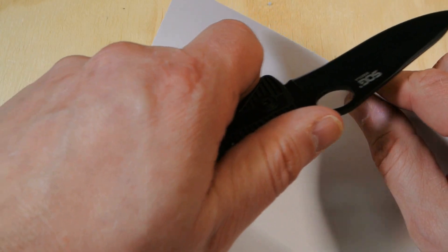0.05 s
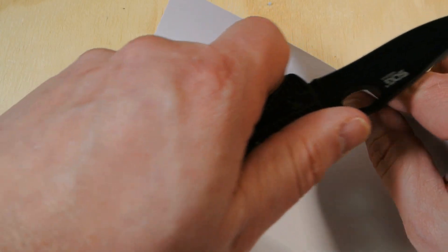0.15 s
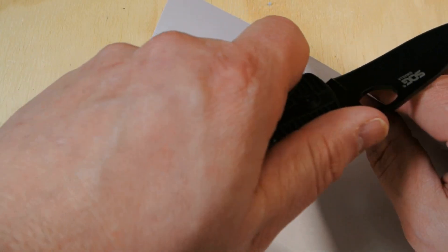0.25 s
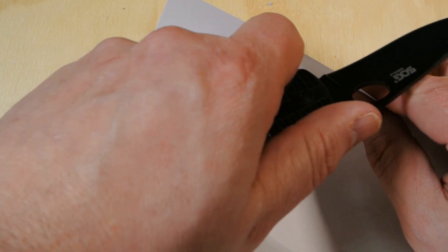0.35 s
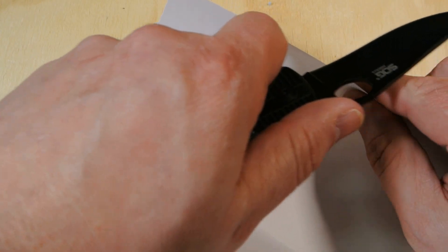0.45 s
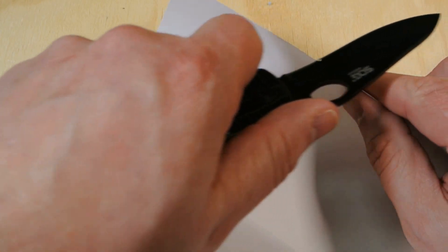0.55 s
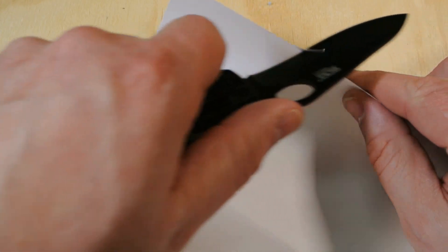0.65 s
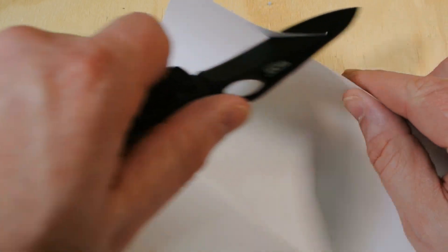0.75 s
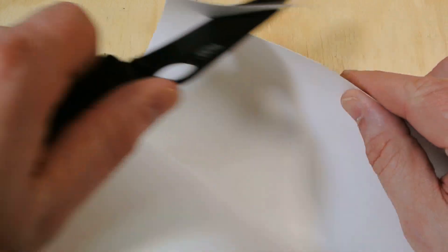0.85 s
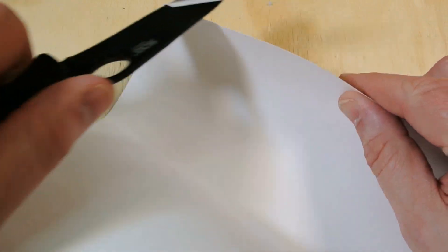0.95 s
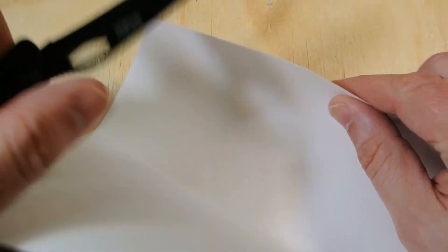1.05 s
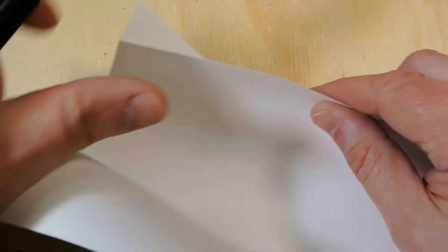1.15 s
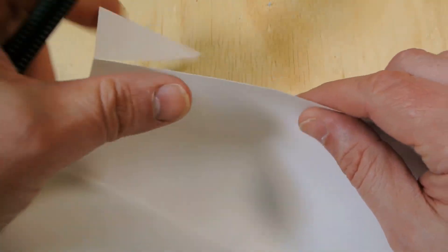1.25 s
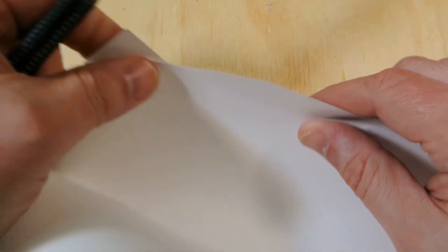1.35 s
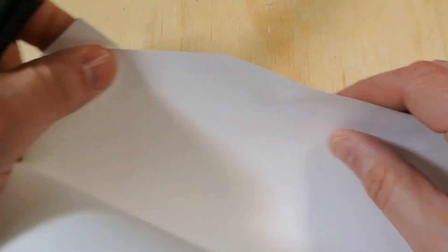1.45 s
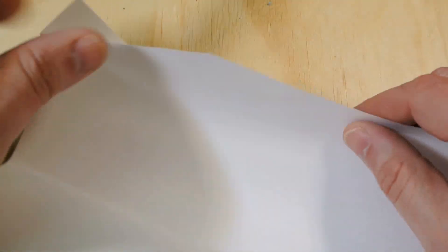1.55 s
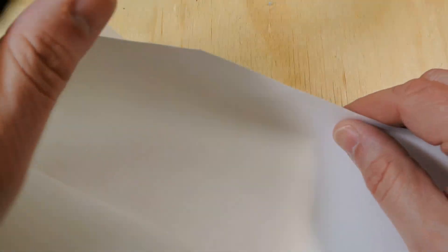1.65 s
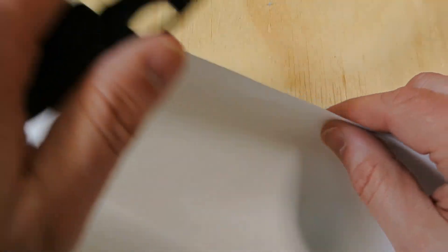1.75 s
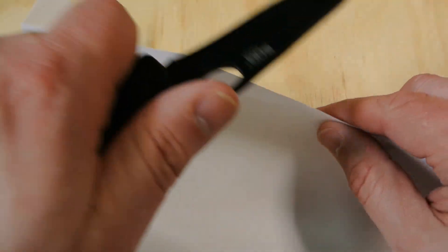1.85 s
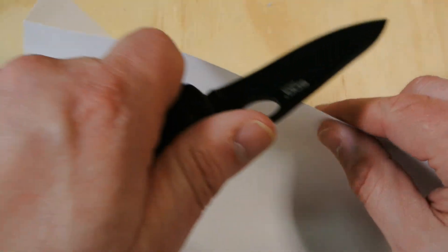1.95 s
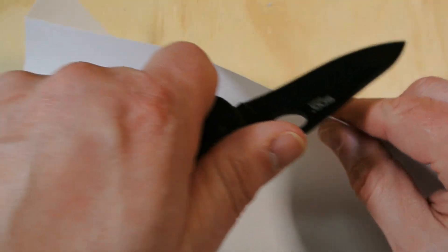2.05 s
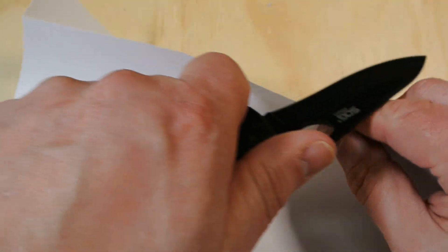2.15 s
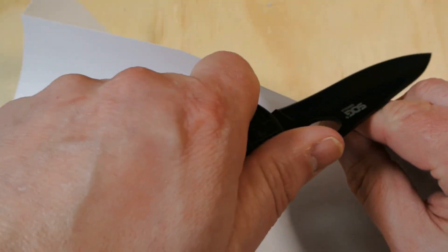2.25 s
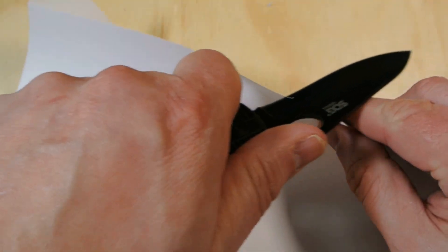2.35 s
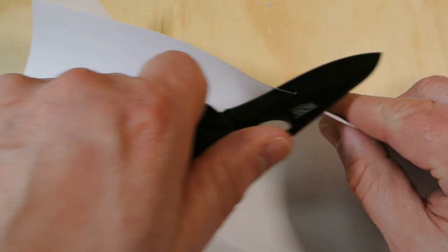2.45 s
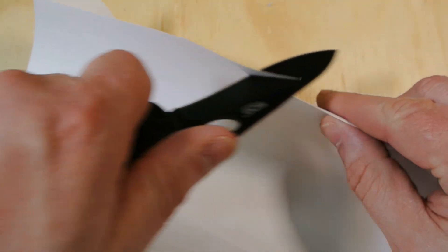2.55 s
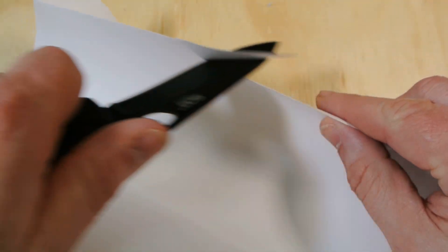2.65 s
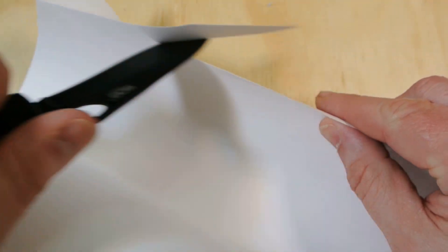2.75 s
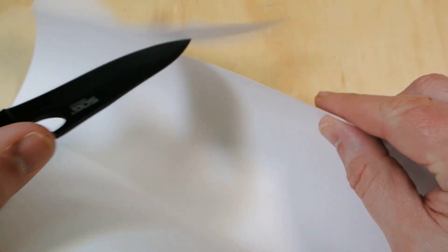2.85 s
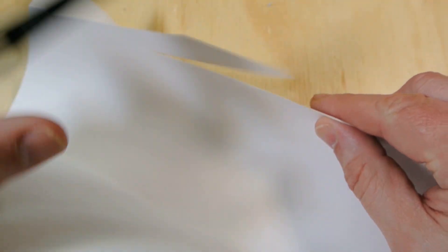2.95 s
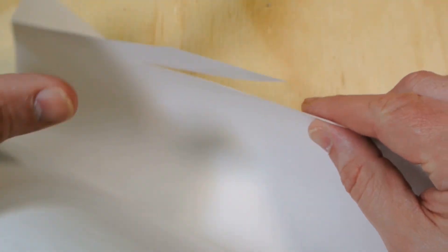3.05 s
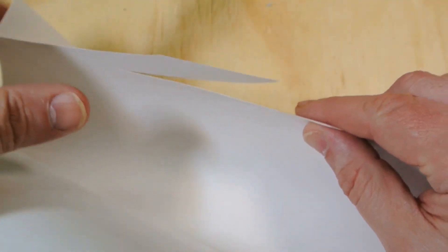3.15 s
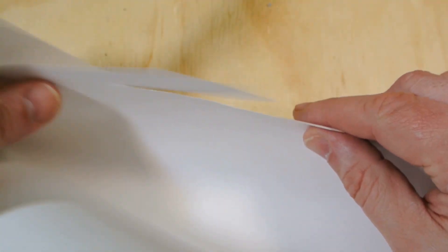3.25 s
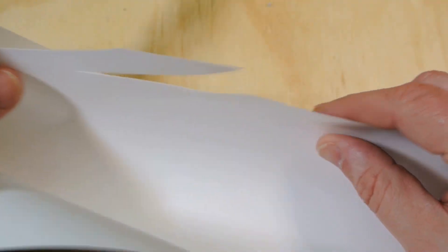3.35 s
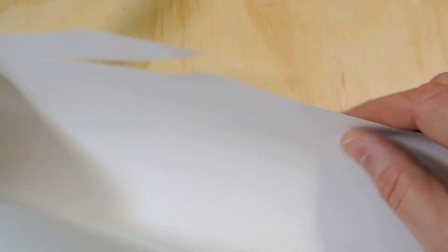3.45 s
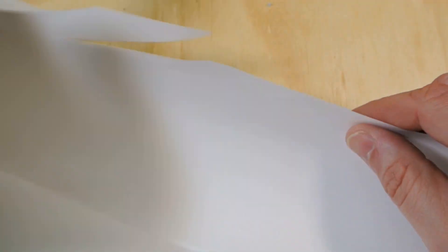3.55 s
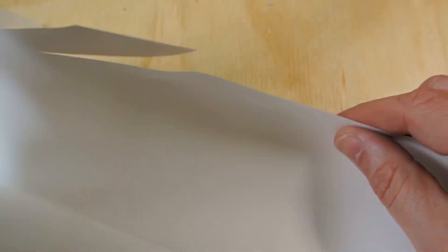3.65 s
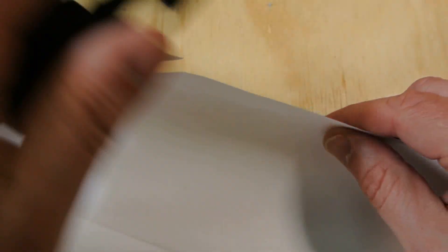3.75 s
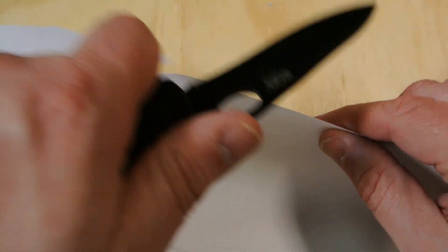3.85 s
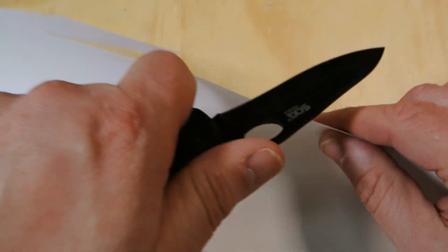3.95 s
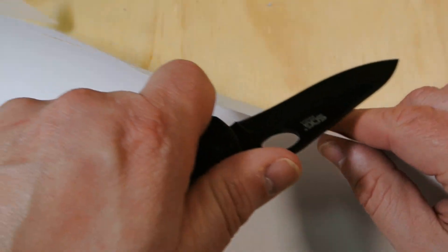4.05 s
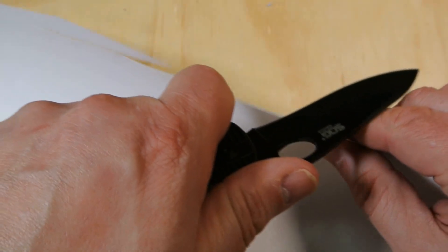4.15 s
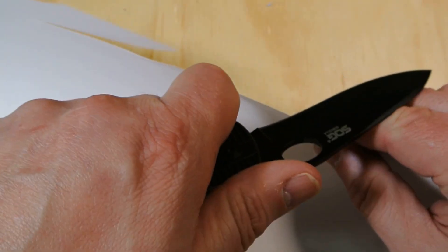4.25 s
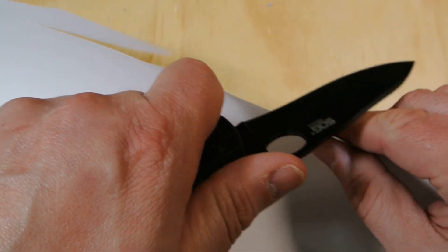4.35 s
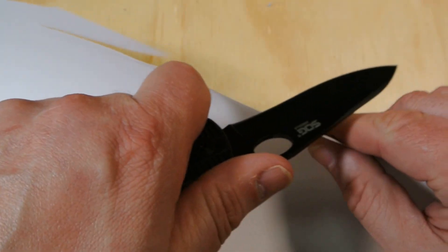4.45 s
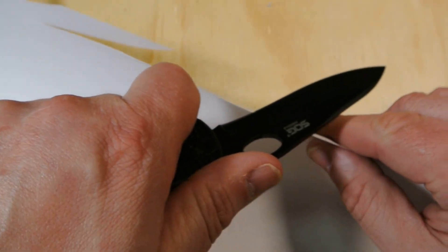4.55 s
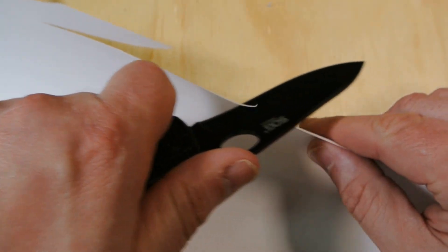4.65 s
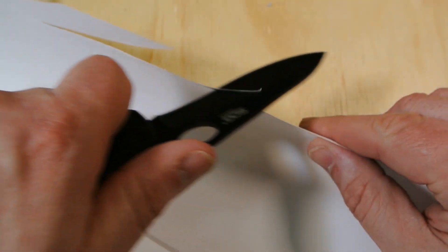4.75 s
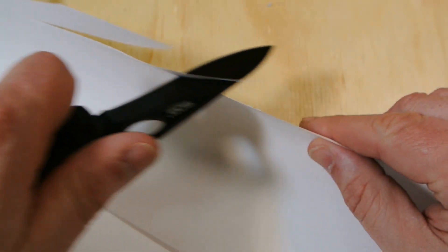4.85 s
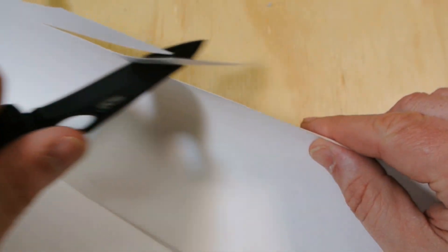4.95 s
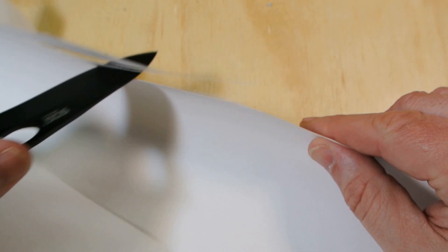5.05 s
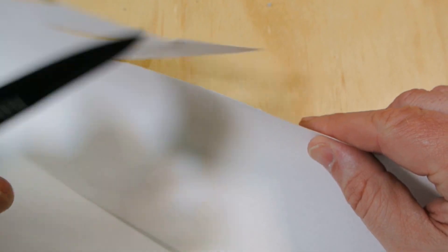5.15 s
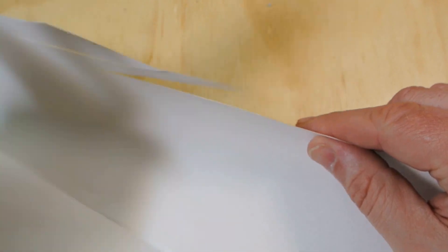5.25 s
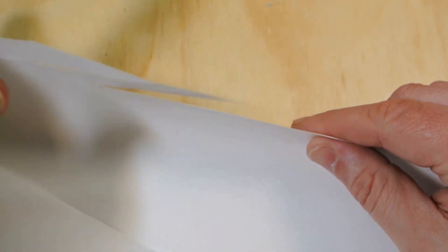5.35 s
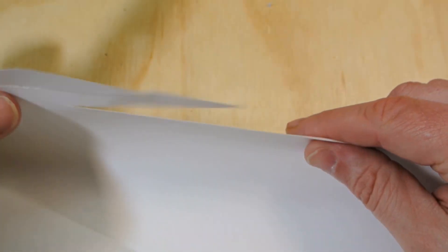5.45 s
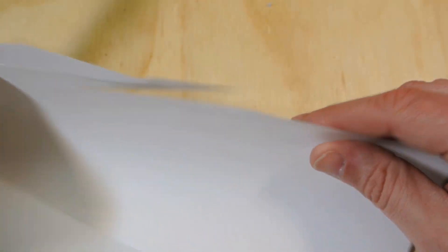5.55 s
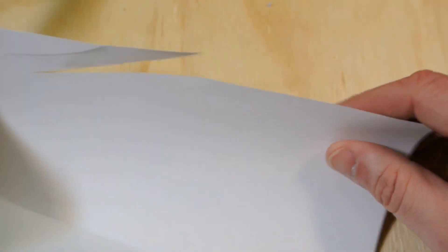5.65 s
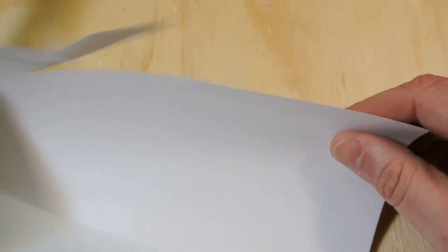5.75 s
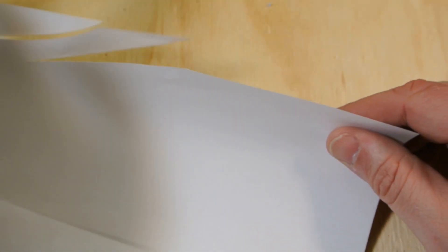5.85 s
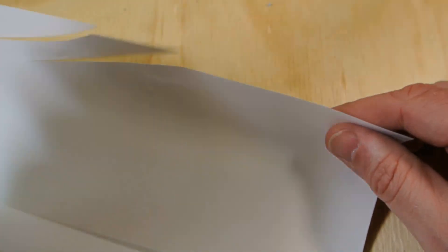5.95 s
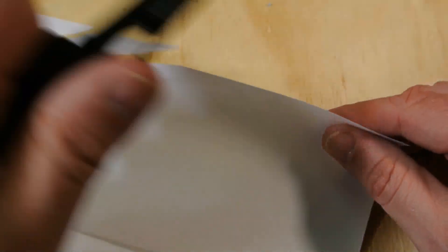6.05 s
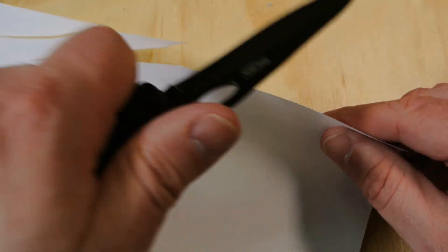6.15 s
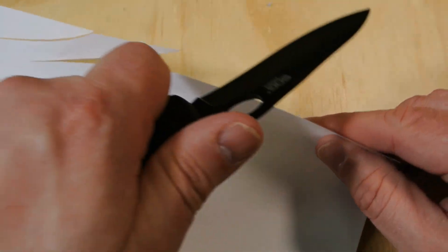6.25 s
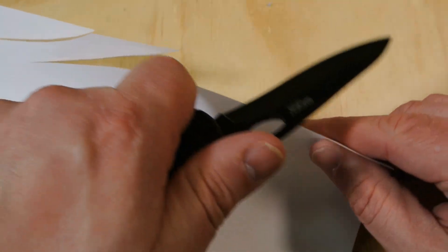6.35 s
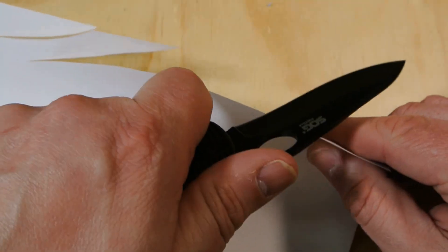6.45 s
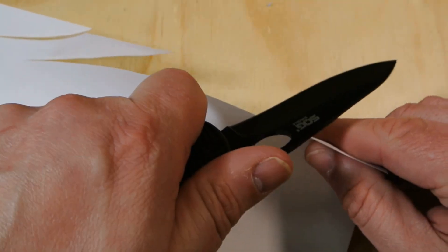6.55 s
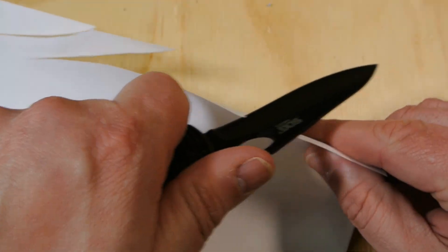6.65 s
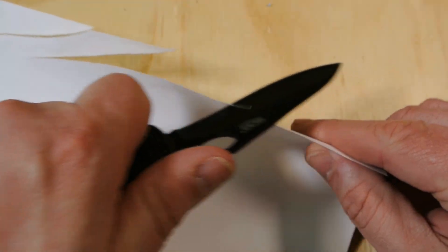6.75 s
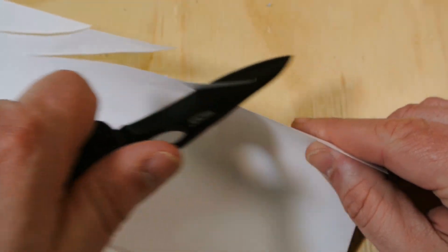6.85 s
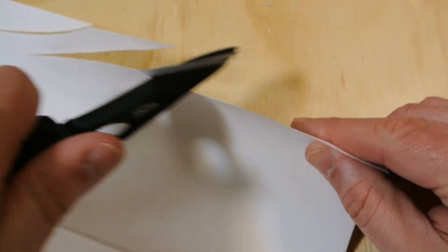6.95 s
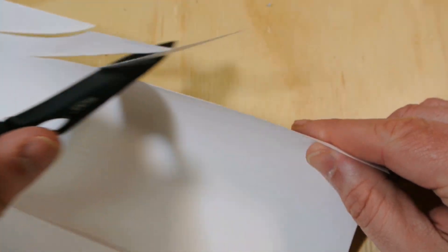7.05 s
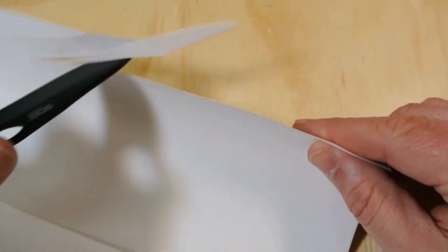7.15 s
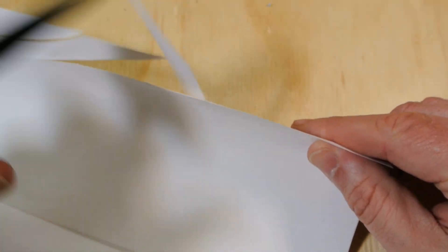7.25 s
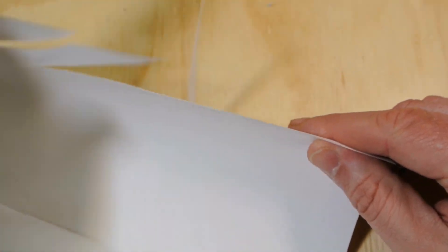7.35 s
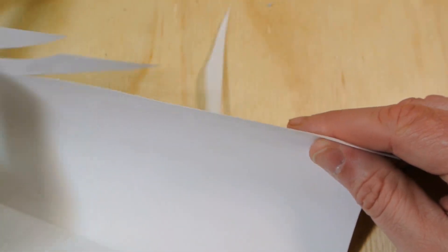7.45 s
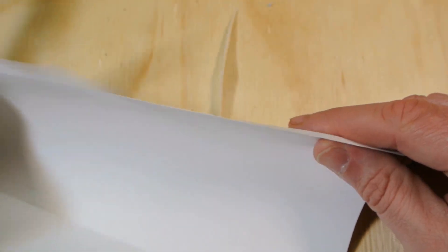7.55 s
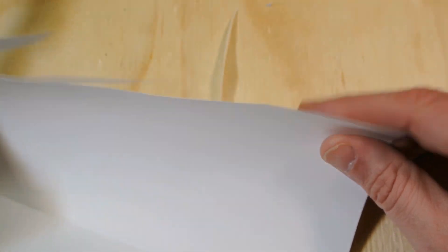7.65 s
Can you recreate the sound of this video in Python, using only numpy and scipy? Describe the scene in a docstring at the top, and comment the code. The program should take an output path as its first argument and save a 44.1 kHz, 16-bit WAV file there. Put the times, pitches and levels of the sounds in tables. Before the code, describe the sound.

A sharp knife slices four crisp strips from a hand-held paper sheet, with rustling, crinkling and small buckling pops between the strokes.

```python
"""A hand-held sheet of paper slides, flexes and buckles with small pops; a knife slices four strips off it.
Cuts start near 0.5, 2.3, 4.5 and 6.6 s: dense random grains (snapping fibres) through moving sheet resonances.
Around them: friction hiss, sparser low crinkles, pops with flutter and crackle, and two faint, breathy,
narrow tones near 1.7 and 1.3 kHz (grains through one resonance). The blade pings just before the third cut.
Small-room reflections, faint air noise and mains hum lie beneath."""
import sys
import numpy as np
from scipy import signal
from scipy.fft import rfft, irfft, next_fast_len
from scipy.io import wavfile
from scipy.ndimage import uniform_filter1d, map_coordinates

SR = 44100
rng = np.random.default_rng(int(sys.argv[2]) if len(sys.argv) > 2 else 0)


def inscribe(sig):
    """Save sig as 16-bit PCM at rate SR to the path in sys.argv[1].

    A 1-D sig is mono; a 2-D sig holds one channel per row.
    Samples are clipped to [-1, 1] before scaling.
    """
    pcm = np.round(np.clip(np.atleast_2d(sig).T, -1, 1) * 32767)
    wavfile.write(sys.argv[1], SR, pcm.astype(np.int16))


N = 340011

# spectrum of the flexing sheet, also under the breathy tones: f/Hz, relative gain/dB
FLEX_SPECTRUM = [(40, -24), (90, -10), (170, 0), (280, 1.5), (340, -1.5), (410, 3.5), (470, 4), (620, 4.5),
                 (1000, 1), (1600, 3), (3000, 2)]
# left-right correlation of the handled sheet: f/Hz, correlation
HANDLING_CORRELATION = [(100, 0.83), (600, 0.98), (1400, 0.73), (3100, 0.5), (7000, 0.0099), (15000, 0.018)]
# left-right correlation of the room: f/Hz, correlation
ROOM_CORRELATION = [(60, 0.12), (300, 0.15), (700, 0.41), (1500, 0.64), (3000, 0.0046), (8000, 0)]
# rise and fall of the slides and the breathy tones
SOFT_ATTACK_S, SOFT_RELEASE_S = 0.049, 0.055


def slicing():
    """Fibres snap by the thousand on the edge, in uneven clumps, and the sheet radiates them."""
    # knife strokes: start/s, length/s, attack/s, release/s, rasp/dB, fizz re rasp/dB, body re rasp/dB,
    # bite/Hz, zing/Hz, zing at/share of stroke, strip/Hz, strip lift/dB, fizz fall over stroke/dB,
    # strip at/share of stroke, shimmer/Hz, shimmer lift/dB, shimmer at/share of stroke
    strokes = [(0.518, 0.5, 0.09, 0.11, -24, 2, -14, 3700, 10400, .38, 2430, 7, 0, 0.48, 12600, 8, 0.96),
               (2.305, 0.57, 0.044, 0.079, -24, 0.5, -15, 3500, 10550, 0.69, 2950, 2, 1.5, 0.97, 13400, 6, 0.49),
               (4.496, 0.627, 0.18, 0.073, -25.5, 0.6, -11.5, 3700, 11250, 0.44, 4950, 6.5, 2, 0.71, 8400, 5.5, 0.68),
               (6.621, 0.55, 0.091, 0.034, -24.5, 0.1, -14, 4500, 10400, .27, 3660, 7.5, 5, 0.98, 9300, 5.5, 0.64)]
    # spectrum of the cut: f/Hz, relative gain/dB
    cut_spectrum = [(88, -59), (150, -31.5), (249, -19), (361, -26.5), (483, -8.5), (673, -5.5), (1030, -5),
                    (1590, -1.5), (2340, -1.5), (2790, -2), (4820, 0), (5420, -3.5), (10700, -8.5),
                    (14400, -5.5), (15800, -4)]
    # left-right correlation of the cut: f/Hz, correlation
    cut_correlation = [(130, 0.98), (640, 0.99), (1400, 0.91), (3100, 0.56), (7000, .14), (15000, .1)]
    # change over one stroke, as the blade leaves the holding fingers
    body_fall_db, rasp_rise_db = 6, 2.4
    # passing resonances: sheet as the blade bites, zing of the edge, strip coming free, second treble
    bite_at, bite_sigma_s, bite_width_hz, bite_lift_db = 0.035, 0.21, 420, 6.5
    zing_sigma_s, zing_width_hz, zing_lift_db = 0.13, 1300, 8
    strip_sigma_s, strip_width_hz = 0.091, 520
    shimmer_sigma_s, shimmer_width_hz = 0.086, 1900

    body, rasp, fizz, rings = 0, 0, 0, []
    for (start, length, attack, release, rasp_db, fizz_db, body_db, bite_hz, zing_hz, zing_at,
         strip_hz, strip_db, fizz_fall_db, strip_at, shimmer_hz, shimmer_db, shimmer_at) in strokes:
        travel = np.clip((np.arange(N) / SR - start) / length, 0, 1) - .5
        stroke = swell(start, length, attack, release) * amp(rasp_db + rasp_rise_db * travel)
        rasp = rasp + stroke
        body = body + stroke * amp(body_db - body_fall_db * travel)
        fizz = fizz + stroke * amp(fizz_db - fizz_fall_db * travel)
        rings += [
            (start + bite_at * length, bite_sigma_s, bite_hz, bite_width_hz, bite_lift_db),
            (start + zing_at * length, zing_sigma_s, zing_hz, zing_width_hz, zing_lift_db),
            (start + shimmer_at * length, shimmer_sigma_s, shimmer_hz, shimmer_width_hz, shimmer_db),
            (start + strip_at * length, strip_sigma_s, strip_hz, strip_width_hz, strip_db)]
    clumps = amp(0.3 * wobble(300) + 1.0 * wobble(45))
    fibres = grains(rate=12000, scatter_db=4.5) * clumps
    radiated = sheet_modes(radiate(fibres, cut_spectrum, cut_correlation))
    sheet = bending(radiated, patchy_db=2.0, rings=rings)
    low = body * band(sheet, 110, 1180)
    middle = rasp * band(sheet, 1267, 6400)
    high = fizz * band(sheet, 6370, 14600)
    return low + middle + high


def buckling():
    """A dent snaps through: a short push of air, a flutter of the sheet, and a spray of crackles."""
    # buckles, or flicks off the blade: t/s, pop gain/dB, crackle gain/dB, cycle rate/Hz
    buckles = [(0.0428, -23, -49, 1450), (1.374, -24, -36, 1580), (1.4617, -9, -19, 1910),
               (1.477, -12, -34, 1190), (1.5558, -21, -18, 1530), (1.5814, -14, -34, 2060),
               (1.6222, -17.5, -24, 1200), (1.631, -9.5, -44, 1440), (1.774, -21.5, -31, 690),
               (1.9442, -28, -37, 1700), (2.318, -27, -30, 2420), (2.8924, -8, -24, 1980),
               (2.8963, -38, -21.5, 2010), (3.053, -20.5, -30.5, 1560), (3.138, -27, -37, 1260),
               (3.2125, -20, -26.5, 1660), (3.3477, -15, -19, 1180), (3.3895, -15, -21, 1670),
               (3.532, -10.5, -24, 1490), (3.5682, -13, -20.5, 1610), (3.58, -13, -36, 1560),
               (3.9961, -10, -22, 1400), (4.008, -33, -13, 1740), (4.0156, -20, -17, 1630),
               (4.1388, -14, -24, 1310), (4.149, -18.5, -40, 686), (4.096, -38, -28, 2400),
               (4.2363, -25, -29, 1060), (4.249, -34, -34.5, 1700), (4.4875, -15.5, -31.5, 2080),
               (5.12, -20.5, -26, 1900), (5.1472, -13, -21.5, 2100), (5.152, -17, -23, 2120),
               (5.1702, -21, -33, 2320), (5.4624, -16, -16, 2140), (5.4925, -13, -32, 1330),
               (5.597, -15.5, -26, 1640), (5.704, -16.5, -36, 1510), (5.7756, -14, -21, 1800),
               (5.7982, -14, -77, 1520), (7.153, -18, -42, 1700), (7.247, -38, -31, 2090),
               (7.5445, -10.5, -29, 1200), (7.5581, -17, -37, 1900), (7.5792, -14, -35, 1580),
               (7.642, -21.5, -29, 1010), (7.6854, -14.5, -6.5, 1410)]
    # spectrum of the crackles: f/Hz, relative gain/dB
    crackle_spectrum = [(100, -40), (300, -16), (550, -4.5), (1500, -11), (3500, 4), (6000, -1),
                        (11000, -0.5), (16000, -4)]
    # the harder the snap, the sooner its crackle is over
    straggler_t60_s, straggler_ref_db, straggler_halving_db = 0.034, -29.5, 24
    # decay in cycles: a large, low dent flutters longer than a small one
    flutter_t60_cycles, flutter_db, push_db = 59, 1, -2

    out, t = np.zeros((2, N + SR)), np.arange(SR // 8) / SR
    noise = rng.standard_normal((2, N))
    spray = np.tile(radiate(noise, crackle_spectrum, HANDLING_CORRELATION), 2)
    for s, pop_db, crackle_db, hz in buckles:
        first = round(s * SR) - 44
        span = slice(first, first + len(t))
        cycles = (t - 50 / SR) * hz
        # the dent flips fast, the wider sheet around it follows more slowly
        push = ripple(1.116 * cycles) + amp(-19.5) * ripple(0.36 * cycles)
        # bending waves run back from the edges of the sheet
        decay = amp(-60 * t * hz / flutter_t60_cycles)
        returns = rng.standard_normal(len(t)) * decay * (1 - np.exp(-t / 0.00036))
        flutter = signal.fftconvolve(push, returns / np.linalg.norm(returns))[:len(t)]
        pop = amp(push_db) * push + amp(flutter_db) * flutter
        # the first fibres give way together, and stragglers follow
        t60 = straggler_t60_s * 2 ** ((straggler_ref_db - crackle_db) / straggler_halving_db)
        burst = amp(4.0 - 60 * t / 0.011) + amp(0.5 - 60 * t / t60)
        burst = burst * (1 - np.exp(-t / 0.0011))
        out[:, span] += amp(pop_db) * pop + amp(crackle_db) * burst * spray[:, span]
    return out[:, :N]


def handling():
    """The paper's grain hisses against skin and wood; flexing adds sparser, lower crinkles."""
    # slides under fingers or blade: start/s, length/s, sliding/dB, hiss re sliding/dB
    slides = [(-0.03, 0.33, -42.5, -2.5), (0.225, 0.98, -47.5, -2.5), (0.985, 0.07, -33.5, 7),
              (1.09, 0.23, -41.5, 2), (1.258, 0.13, -41.5, -4), (1.345, 0.28, -31.5, 4),
              (1.567, 0.28, -37, -1.5), (1.781, 0.18, -43.5, -3), (1.922, 0.22, -40.5, -2),
              (2.094, 0.18, -40, -3), (2.234, 0.18, -40.5, -8), (2.848, 0.064, -32, -3),
              (2.885, 0.25, -51.5, 0), (3.02, 0.59, -44, 0.5), (3.278, 0.18, -29, 3),
              (3.394, 0.18, -30, 1.5), (3.535, 0.596, -38, 0), (3.914, 0.12, -35, 2.5),
              (4.097, 0.16, -42.5, -5), (4.244, 0.51, -50.5, -3), (5.078, 0.15, -40.5, -6),
              (5.223, 0.28, -45.5, -2.5), (5.388, 0.501, -34.5, 1), (5.515, 0.14, -36, 8),
              (5.68, 0.14, -37.5, 7), (5.82, 1, -52, 0), (5.894, 0.093, -37, -4.5),
              (5.982, 0.075, -53.5, 11), (6.182, 0.27, -49, -1.5), (7.11, 0.15, -42.5, -1.5),
              (7.222, 0.054, -34.5, 6), (7.24, 0.075, -59, -4), (7.38, 0.088, -54, 1),
              (7.438, 0.12, -44.5, 1.5), (7.526, 0.22, -35, 4.5)]
    # bends to take a new grip: start/s, length/s, flexing/dB, bass lift/dB
    flexes = [(0.027, 0.092, -42, -10), (0.53, 0.246, -42, 1), (1.103, 0.12, -49, 6),
              (1.268, 0.11, -31, -0.5), (1.362, 0.49, -39, 4), (1.93, 0.26, -50.5, -4),
              (3.035, 0.086, -34, -3), (3.092, 0.64, -43.5, 4.5), (3.976, 0.34, -44.5, 4),
              (4.487, 0.2, -47, 1), (5.409, 0.498, -39.5, -9), (6.055, 0.09, -45.5, 2),
              (6.259, 0.064, -42, 4), (6.576, 0.18, -45, -5), (7.018, 0.14, -45.5, -20),
              (7.538, 0.16, -36.5, -13)]
    # spectrum of the friction: f/Hz, relative gain/dB
    slide_spectrum = [(590, -36), (1000, 12), (1230, 4), (1870, -3), (2050, 1.5), (2520, 0.5), (3950, 3.5),
                      (7130, -2.5), (11400, 0.5), (15100, -4), (15800, -8)]
    slide_arch_db = 2  # louder by this at the middle of a slide
    flex_attack_s, flex_release_s, flex_bass_hz = 0.027, 0.044, 332
    # stir of the sheet held still; flexing that comes with any sliding
    grip_db, flex_per_slide_db = -58, -12

    moves = [(amp(db) * swell(s, length, SOFT_ATTACK_S, SOFT_RELEASE_S, slide_arch_db), hiss_db)
             for s, length, db, hiss_db in slides]
    bends = [(amp(db) * swell(s, length, flex_attack_s, flex_release_s), bass_db)
             for s, length, db, bass_db in flexes]
    sliding, hissing = together(moves, amp(grip_db))
    flexing, booming = together(bends, amp(flex_per_slide_db) * sliding)

    roughness = amp(1.03 * wobble(200) + 0.49 * wobble(55))
    friction = grains(rate=12000, scatter_db=3.0) * roughness
    rub = bending(radiate(friction, slide_spectrum, HANDLING_CORRELATION), patchy_db=1.5)
    slide = sliding * band(rub, 1440, 6730, order=6) + hissing * band(rub, 5930, 23000)

    crinkles = grains(rate=1800, scatter_db=-1.5) * amp(3.1 * wobble(70))
    radiated = sheet_modes(radiate(crinkles, FLEX_SPECTRUM, HANDLING_CORRELATION))
    flex = band(bending(radiated, patchy_db=0.5), 50, 2940, order=5)
    bass = filtered(flex, lambda f: 1 / (1 + (f / flex_bass_hz) ** 4))
    return slide + flexing * (flex - bass) + booming * bass


def breathy_tones():
    """Dense random grains through one narrow resonance give a faint, breathy tone."""
    # faint tones: start/s, length/s, f/Hz, level/dB
    tones = [(1.927, 0.12, 1740, -41.5), (5.936, 0.29, 1270, -53)]
    width_hz = 230
    source = radiate(grains(rate=3400, scatter_db=6.5), FLEX_SPECTRUM, HANDLING_CORRELATION)
    out = 0
    for s, length, hz, db in tones:
        tone = unit(filtered(source, lambda f: 1 / (1 + (2 * (f - hz) / width_hz) ** 2)))
        out = out + amp(db) * swell(s, length, SOFT_ATTACK_S, SOFT_RELEASE_S) * tone
    return out


def blade_ping(at_s=4.4861, hz=2620, t60_s=0.092, db=-31):
    """The steel rings briefly as it is set down on the paper's edge."""
    t = np.arange(N) / SR - at_s
    decay = (t > 0) * amp(db - 60 * np.abs(t) / t60_s)
    return decay * np.sin(2 * np.pi * hz * t + .5 * wobble(300))


def sheet_modes(x):
    """The resonances that the held sheet keeps however it bends."""
    # fixed resonances: f/Hz, width/Hz, lift/dB
    modes = [(616, 290, 1.5), (1640, 220, 1), (2470, 180, 0), (6700, 500, 1.5), (8700, 780, -0.5),
             (12200, 2700, 1)]
    lift_db = lambda f: sum(db / (1 + (2 * (f - hz) / width) ** 2) for hz, width, db in modes)
    return filtered(x, lambda f: amp(lift_db(f)))


def bending(x, patchy_db, rings=()):
    """The sheet changes shape, so its many resonances come and go; a few stand out."""
    hz, t, z = signal.stft(x, SR, nperseg=512)
    field = uniform_filter1d(rng.standard_normal(z.shape), size=4, axis=1)
    field = uniform_filter1d(field, size=18, axis=2)
    field = field + field.mean(0)  # partly shared by both sides
    lift_db = patchy_db * field / field.std()
    for s, sigma_s, centre_hz, width_hz, db in rings:
        peak = 1 / (1 + (2 * (hz - centre_hz) / width_hz) ** 2)
        passing = np.exp(-.5 * ((t - s) / sigma_s) ** 2)
        lift_db = lift_db + db * np.outer(peak, passing)
    return signal.istft(z * amp(lift_db), nperseg=512)[1][:, :N]


def radiate(pair, spectrum, correlation):
    """Colour two unrelated signals and blend them into left and right, at rms 1."""
    turn = lambda hz: np.arccos(np.clip(along(correlation, hz), -1, 1)) / 2
    blend = lambda hz: np.array([np.cos(turn(hz)), np.sin(turn(hz))])
    mid, side = filtered(pair, lambda hz: amp(along(spectrum, hz)) * blend(hz))
    return unit(np.array([mid + side, mid - side]))


def grains(rate, scatter_db):
    """Two trains of one-sample impulses at random moments, rate per second, with scattered sizes."""
    happens = rng.random((2, N)) < rate / SR
    sign = rng.choice([-1, 1], (2, N))
    return happens * sign * amp(scatter_db * np.clip(rng.standard_normal((2, N)), -2, 2))


def ripple(cycles):
    """One dip, crest and dip of air pressure; it carries little bass."""
    return (1 - 2 * (np.pi * cycles) ** 2) * np.exp(-(np.pi * cycles) ** 2)


def swell(start, length, attack, release, arch_db=0):
    """Level of one event: smooth rise and fall, arch_db louder midway."""
    t = np.arange(N) / SR - start
    ease = lambda u: np.sin(np.pi / 2 * np.clip(u, 0, 1)) ** 2
    moving = (t > 0) & (t < length)
    t, out = t[moving], np.zeros(N)
    arch = amp(arch_db * (np.sin(np.pi * t / length) - 2 / np.pi))
    out[moving] = ease(t / attack) * ease((length - t) / release) * arch
    return out


def together(moves, rest):
    """Power sum of overlapping movements: plain, and with the lift that each gives to one band."""
    plain = np.sqrt(rest ** 2 + sum(move ** 2 for move, _ in moves))
    lifted = np.sqrt(rest ** 2 + sum((move * amp(lift_db)) ** 2 for move, lift_db in moves))
    return plain, lifted


def amp(db):
    """Amplitude factor of a level in dB."""
    return 10 ** (np.asarray(db) / 20)


def unit(x):
    """Scale a stereo pair so that its middle has rms 1."""
    return x / np.sqrt(np.mean(x.mean(0) ** 2) + 1e-20)


def along(points, hz):
    """Interpolate (f/Hz, value) points on a log axis."""
    f, v = np.transpose(points)
    return np.interp(np.log(hz + 1), np.log(f + 1), v)


def curves(rows):
    """One value per sample for each column after the time."""
    s, *cols = np.transpose(rows)
    return [np.interp(np.arange(N) / SR, s, c) for c in cols]


def wobble(rate):
    """A smooth random curve, rate knots a second."""
    knots = rng.standard_normal(int(N * rate / SR) + 4)
    return map_coordinates(knots, [np.arange(N) * rate / SR])


def filtered(x, response):
    """x times a response of frequency."""
    m = next_fast_len(N + SR // 2)
    return irfft(rfft(x, m) * response(np.fft.rfftfreq(m, 1 / SR)), m)[..., :N]


def band(x, lo, hi, order=12):
    """The part of x between two frequencies, at rms 1."""
    return unit(filtered(x, lambda f: 1 / (1 + (f / hi) ** order) - 1 / (1 + (f / lo) ** order)))


def room(x):
    """Diffuse reflections at each side; each frequency dies at its own speed."""
    # reverberation: f/Hz, t60/s
    decay = [(200, 0.46), (2000, 0.17), (6000, 0.14), (14000, 0.11)]
    spectrum = [(100, -14.5), (2000, -2.5), (12000, -8)]  # f/Hz, relative gain/dB
    diffuse = radiate(rng.standard_normal((2, N)), spectrum, ROOM_CORRELATION)[:, :SR // 3]
    hz, t, z = signal.stft(diffuse, SR, nperseg=128)
    tail = signal.istft(z * amp(-60 * t / along(decay, hz)[:, None]), SR, nperseg=128)[1]
    delayed = np.pad(tail, ((0, 0), (60, 0)))  # 60 samples before the first reflection
    return signal.fftconvolve(x, delayed / np.linalg.norm(tail[0]), axes=1)[:, :N]


def room_tone(paper):
    """Faint air noise and mains hum; both sink while the paper is loud and swell back afterwards."""
    # spectrum of the air noise: f/Hz, relative gain/dB
    air_spectrum = [(25, -12), (48, -9), (70, -8.5), (100, -4.5), (150, -6), (300, -2), (480, -3.5),
                    (700, -3.5), (1200, -5.5), (3000, -15.5), (15800, -22.5)]
    air = radiate(rng.standard_normal((2, N)), air_spectrum, ROOM_CORRELATION)
    hum = np.sin(2 * np.pi * 59.4 * np.arange(N) / SR) * amp(.6 * wobble(4.8))
    keep = np.exp(-1 / (.15 * SR))  # 0.15 s averaging
    recent_power = signal.lfilter([1 - keep], [1, -keep], np.mean(paper ** 2, axis=0))
    duck = 1 / np.sqrt(1 + recent_power / amp(-23.0) ** 2)
    return duck * (amp(-52.5) * air + amp(-67.0) * hum)


def scene():
    """Cuts and handling alternate; bench and walls answer them."""
    # side to which the sheet throws its treble: t/s, left minus right/dB
    facing = [(0, -0.5), (0.8, -0.3), (1.5, 1), (2.3, -0.5), (2.8, 1), (3.4, 2.5), (4.1, 1.3), (4.8, 2.7),
              (5.7, 2.5), (6.9, 1.5), (7.7, 4.5)]
    # steady stereo balance: f/Hz, left minus right/dB
    lean = [(300, 0), (1300, -1), (4400, -2.5), (9000, 0.2), (15000, 2)]
    pops = buckling() + blade_ping()
    soft = slicing() + handling() + breathy_tones()
    paper = soft + pops + amp(-11.5) * room(pops + amp(-2) * soft)
    sides = np.array([[.5], [-.5]])
    # only the short waves are beamed by the tilt of the sheet
    treble = filtered(paper, lambda hz: 1 - 1 / (1 + (hz / 2000) ** 2))
    paper = paper + treble * (amp(sides * curves(facing)[0]) - 1)
    return filtered(paper, lambda hz: amp(sides * along(lean, hz))) + room_tone(paper)


def record(dry):
    """Clip at full scale, then remove everything from the band limit up."""
    top_hz = 15950
    return filtered(np.clip(dry, -1, 1), lambda hz: hz < top_hz)


dry = scene()
out = record(dry)
inscribe(out)
```